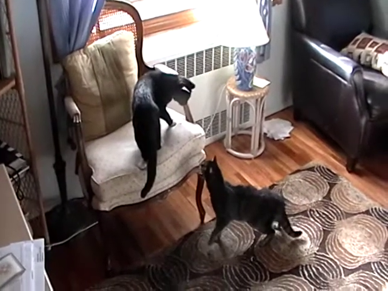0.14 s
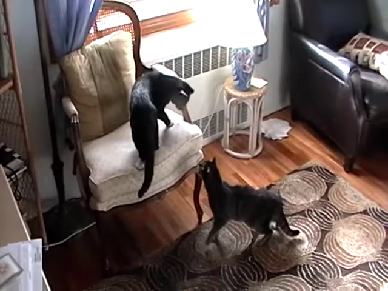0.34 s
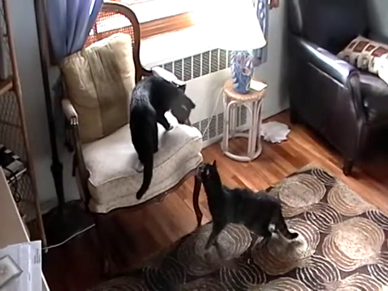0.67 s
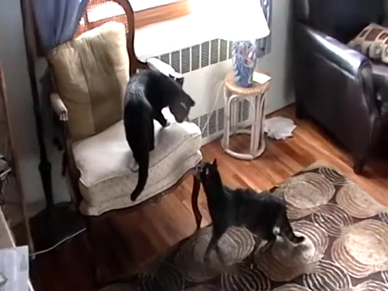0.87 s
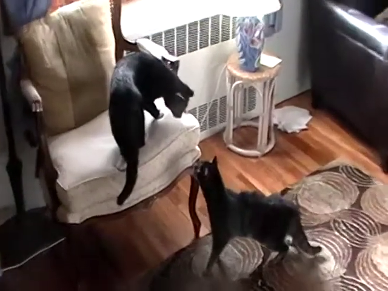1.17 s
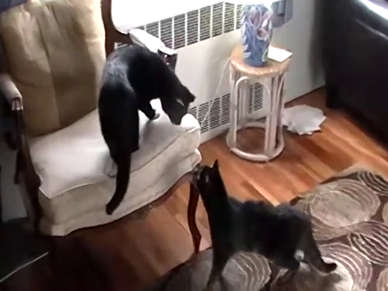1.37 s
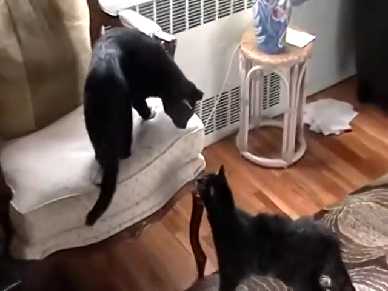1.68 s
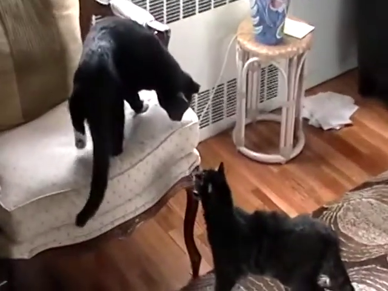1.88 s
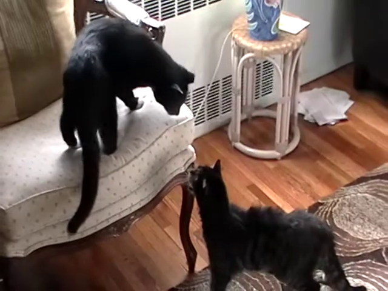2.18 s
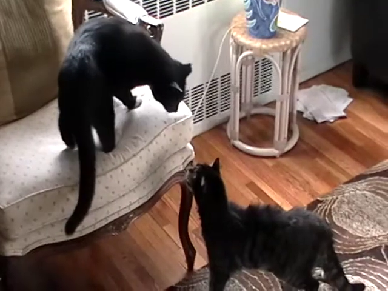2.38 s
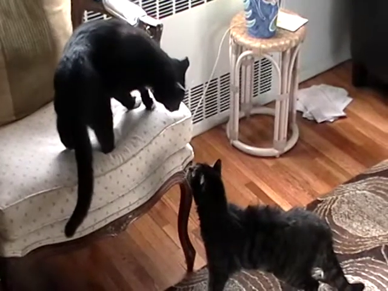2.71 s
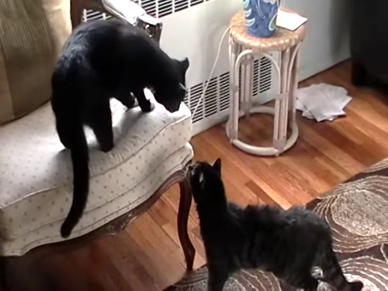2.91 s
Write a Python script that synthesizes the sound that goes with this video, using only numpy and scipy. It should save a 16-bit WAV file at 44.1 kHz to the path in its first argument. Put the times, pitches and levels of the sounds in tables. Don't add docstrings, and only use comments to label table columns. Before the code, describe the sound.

Two tense cat yowls with a short gap between them, breathy and raspy at the edges; a faint distant chirp sounds in the gap, over quiet room hum, hiss and light recorder knocks.

```python
import sys
import numpy as np
from scipy import signal
from scipy.fft import rfft, irfft
from scipy.io import wavfile
from scipy.ndimage import uniform_filter1d

SR = 44100
rng = np.random.default_rng(int(sys.argv[2]) if len(sys.argv) > 2 else 0)


def digitize_waveform(pressure):
    field = np.atleast_2d(pressure).T
    bounded = np.clip(field, -1, 1)
    quanta = np.round(bounded * 32767).astype(np.int16)
    wavfile.write(sys.argv[1], SR, quanta)


def to_linear_factor(level_db):
    exponent = np.asarray(level_db, float) / 20
    return 10 ** exponent


N = 134505


def at_hz(points, hz):
    table_hz, value = np.transpose(points)
    return np.interp(np.log(hz + 1), np.log(table_hz), value)


def rms_one(x):
    return x / np.sqrt(np.mean(x ** 2) + 1e-20)


def drift(rate_hz):
    r = np.exp(-2 * np.pi * rate_hz / SR)
    wander = signal.lfilter([1], [1, -2 * r, r * r], rng.standard_normal(N + SR))
    return rms_one(wander[SR:])


def stereo(mid, side):
    return np.array([mid + side, mid - side])


def pan(x, left_db):
    return x * to_linear_factor(np.array([[left_db], [-left_db]]) / 2)


def bumps(rows, size):
    t = np.arange(N) / SR
    return sum(k * np.exp(-.5 * ((t - row[0]) / row[1]) ** 2) for row, k in zip(rows, size))


def puffs(rows, band_hz):
    band = signal.butter(2, band_hz, "band", fs=SR, output="sos")
    noise = rms_one(signal.sosfilt(band, rng.standard_normal(N)))
    return noise * bumps(rows, to_linear_factor(np.array(rows)[:, -1])) * to_linear_factor(4.0 * drift(100))


# f/Hz, level/dB
TONE_SIDE = [(40, -7), (70, -8.5), (150, 3), (300, -7), (1000, 3.5), (2400, 3.5), (6000, -1.5),
             (15000, -1.5)]


def floor(spectrum, level_db, patchy_db):
    hz = np.fft.rfftfreq(N, 1 / SR)
    inside = (hz > spectrum[0][0]) & (hz < spectrum[-1][0])
    gain = to_linear_factor(at_hz(spectrum, hz)) * inside
    side_gain = to_linear_factor(at_hz(TONE_SIDE, hz))
    noise = rfft(rng.standard_normal((2, N)))
    mid, side = irfft(noise * gain * [np.ones_like(hz), side_gain], N)
    return to_linear_factor(level_db + patchy_db * drift(9.0)) * stereo(mid, side) / np.std(mid)


# f/Hz, density/dB per Hz
RUMBLE = [(15, -48.5), (25, -17.5), (65, 2), (81, 0.5), (141, -5.5), (189, -5.5), (216, -3.5), (240, -10),
          (310, -26.5), (530, -120)]
# f/Hz, density/dB per Hz
TONE = [(140, -27), (240, 0.5), (536, -6), (665, -9), (1030, -10), (1150, -11), (2000, -19), (2500, -25),
        (3250, -41.5), (5500, -120)]
# f/Hz, density/dB per Hz
HISS = [(1470, -18), (2500, -5), (4040, -5.5), (4640, -8), (6640, -9.5), (15500, -19)]


def room_tone():
    rumble = floor(RUMBLE, level_db=-67, patchy_db=0)
    hum = floor(TONE, level_db=-60, patchy_db=.7)
    hiss = floor(HISS, level_db=-69.5, patchy_db=.2)
    return rumble + hum + hiss


# t/s, f/Hz, level/dB
CHIRP = [
    (.97, 2110, -90),
    (1.0, 2075, -68),
    (1.09, 2060, -66),
    (1.15, 1975, -72),
    (1.22, 2040, -67),
    (1.28, 2000, -71),
]


def chirp():
    s, hz, db = np.transpose(CHIRP)
    t = np.arange(N) / SR
    phase = 2 * np.pi * np.cumsum(np.interp(t, s, hz)) / SR
    level_db = np.interp(t, s, db, -150, -150) + 2 * drift(27)
    octave_db = 0
    return to_linear_factor(level_db) * (np.sin(phase) + to_linear_factor(octave_db) * np.sin(2 * phase))


# t/s, peak/dB, f/Hz, snap/dB
CLICKS = [
    (0.401, -39, 880, -20),
    (0.65, -44.5, 860, -27),
    (.697, -42.5, 830, -22.5),
    (0.903, -33.5, 477, -24),
    (1.301, -49.5, 970, -23),
    (2.2335, -40, 890, 10),
    (2.728, -46, 2200, 1),
]


def clicks():
    decay_cycles, snap_decay_s = 11.6, .004
    out, t = np.zeros(N + SR), np.arange(SR // 20) / SR
    band = signal.butter(2, (700, 4500), "band", fs=SR, output="sos")
    for s, db, hz, snap_db in CLICKS:
        attack = np.minimum(t * hz, 1)
        knock = 3 * np.sin(2 * np.pi * hz * t) * to_linear_factor(-60 * t * hz / decay_cycles) * attack
        snap = rng.standard_normal(len(t)) * to_linear_factor(snap_db + 5 - 60 * t / snap_decay_s)
        start = int(s * SR)
        out[start:start + len(t)] += to_linear_factor(db) * (knock + signal.sosfilt(band, snap))
    return pan(out[:N], left_db=-1.5)


# t/s, half length/s, level/dB
RUSTLES = [
    (1.565, 0.019, -64.5),
    (3.0, 0.054, -63.5),
]


def rustles():
    return puffs(RUSTLES, band_hz=(620, 2200))


# t/s, half length/s, breath gain/dB, sizzle/dB
SPITS = [(0.053, 0.01, 5.5, -64), (0.086, 0.012, 9, -70.5), (0.281, 0.02, 4.5, -96),
         (0.622, 0.0046, 1, -80), (0.709, .006, 1.5, -74.5), (0.88, 0.03, 5.5, -74),
         (1.662, 0.028, 12, -69), (1.784, 0.0084, 0, -73.5), (1.837, 0.029, 6.5, -70.5),
         (1.953, 0.0095, 14, -64.5), (2.052, 0.0088, 5.5, -64.5), (2.445, 0.032, 3.5, -81.5),
         (2.652, 0.019, -7.5, -68.5), (2.817, 0.036, -3, -73.5)]


def spits():
    return puffs(SPITS, band_hz=(7000, 10900))


def hump(hz, centre_hz, width_hz, height_db):
    off = 2 * (hz - centre_hz) / width_hz
    return 10 * np.log10(1 + to_linear_factor(2 * height_db) / (1 + off ** 2) ** 2)


# f/Hz, level/dB
THROAT = [(500, -15), (1050, 0), (1600, -10), (2200, -14), (3300, -15), (4200, -26), (7000, -30),
          (10000, -50)]


def tract_db(hz, mouth_hz, height_db, bright_db, top_hz, top_db, chest_db, upper):
    throat = at_hz(THROAT, hz)
    mouth = hump(hz, mouth_hz, 294, height_db)
    bright = bright_db / (1 + (2200 / (hz + 1)) ** 4)
    fall_db_per_khz = 7
    top = hump(hz, top_hz, 190, top_db) - fall_db_per_khz * np.maximum(hz - top_hz, 0) / 1000
    chest = chest_db * (hz < 700)
    return throat + mouth + bright + top + chest + sum(hump(hz, *peak) for peak in upper)


def fading_db(fades, hz):
    out, t = np.zeros(N), np.arange(N) / SR
    for s, half, place_hz, db in fades:
        near = slice(max(int((s - 4 * half) * SR), 0), int((s + 4 * half) * SR))
        width_hz = max(200, .1 * place_hz * (place_hz > 3400))
        off = (hz[near] - place_hz) / width_hz
        out[near] += db * np.exp(-.5 * ((t[near] - s) / half) ** 2 - .5 * off ** 4)
    return out


# t/s, roughness/0-1
ROUGH = [(.1, 1), (.15, .08), (.86, .08), (.9, .8), (1.65, .9), (1.86, .75), (1.9, .3), (2.08, .35),
         (2.13, .08), (2.61, .06), (2.65, .4), (2.72, .35), (2.77, .2), (2.82, .8)]


def fold_rate(pitch, rough, spit_db):
    t, lag_s = np.arange(N) / SR, .02
    path = uniform_filter1d(np.interp(t, *np.transpose(pitch)), size=int(lag_s * SR))
    jitter = .0007 * drift(38)
    rasp = .007 * (rough + .1 * spit_db) * drift(120)
    settle = 130 * np.maximum(t - pitch[-1][0], 0)
    scoop = 1200 * np.maximum(pitch[0][0] - t, 0)
    return path * (1 + jitter + rasp) + settle + scoop


def overtones(hz, turns, rough, tract, fades):
    voice = np.zeros(N)
    for k in range(1, 21):
        shimmer = .5 * np.clip(k - 5, .5, 8) * drift(28)
        grain = 5 * rough * np.clip((k - 3) / 3, 0, 1.5) * drift(80)
        level_db = tract_db(k * hz, *tract) + shimmer + fading_db(fades, k * hz) + grain
        voice += to_linear_factor(level_db) * np.sin(2 * np.pi * k * turns + k * k)
    return np.sqrt(2) * voice


# f/Hz, width/Hz, height/dB
AIR_PALATE = (4300, 790, 4.2)


def breath_air(turns, mouth, height, bright, top, top_db, upper):
    bins, times, air = signal.stft(rng.standard_normal(N), SR, nperseg=512)
    at = np.minimum((times * SR).astype(int), N - 1)
    hz = bins[:, None]
    colour = tract_db(hz, mouth[at], 0.57 * height[at], 0.45 * bright[at], top[at], top_db[at] / 2, 0, upper)
    tilt_db_per_octave = 8
    colour = colour + tilt_db_per_octave * np.log2(hz / 2000 + 0.0057) + hump(hz, *AIR_PALATE)
    air = signal.istft(air * to_linear_factor(colour), SR, nperseg=512)[1][:N]
    return air * (1 + 1.15 * np.cos(2 * np.pi * turns))


# t/s, half length/s, f/Hz, change/dB
SWELLS = [(0.66, 0.1, 2200, 7), (.47, 0.02, 1660, 2.5), (0.079, 0.017, 1600, -15), (0.913, 0.044, 590, 0),
          (2.505, 0.051, 2900, -16.5), (2.02, 0.012, 4800, -7.5), (2.865, 0.013, 505, 27),
          (2.6, 0.044, 1010, -7)]


def yowl(pitch, shape, head, upper, fades):
    t = np.arange(N) / SR
    s, *columns = np.transpose(shape)
    effort, mouth, height, bright, breath = [np.interp(t, s, c) for c in columns]
    head_s, *columns = np.transpose(head)
    top, top_db, chest = [np.interp(t, head_s, c) for c in columns]
    rough = np.interp(t, *np.transpose(ROUGH))
    spit_db = bumps(SPITS, np.array(SPITS)[:, 2])
    late, early = np.maximum(t - s[-1], 0), np.maximum(s[0] - t, 0)
    hz = fold_rate(pitch, rough, spit_db)
    turns = np.cumsum(hz) / SR
    tract = mouth, height, bright, top, top_db, chest, upper
    release_s, sigh_s = .11, .14
    voice = overtones(hz, turns, rough, tract, fades + SWELLS) * to_linear_factor(-60 * late / release_s)
    air = breath_air(turns, mouth, height, bright, top, top_db, upper)
    air_db = breath + 16.5 + 2.5 * drift(45) + spit_db - 30 * late / sigh_s
    return to_linear_factor(effort - 18000 * early) * (voice + air * to_linear_factor(air_db))


# t/s, f/Hz
PITCH = [
    [(.05, 540), (.13, 549), (.2, 541), (.265, 533), (.31, 544), (.38, 553), (.53, 555), (.6, 550),
     (.86, 550)],
    [(1.69, 469), (1.88, 524), (2.04, 519), (2.09, 505), (2.29, 513), (2.44, 513), (2.5, 521), (2.595, 522),
     (2.668, 483)],
]
# t/s, effort/dB, mouth f/Hz, mouth height/dB, brightness/dB, breath/dB
YOWL_1 = [(0.034, -83, 2410, 31, 31.5, -5.5), (0.056, -51.5, 2340, 32, -5.5, -4),
          (.14, -49, 1954, 23, 11, -18), (.23, -51.5, 1750, 34, 5, -40),
          (.30, -44.5, 1562, 27.5, 2.5, -18.5), (0.469, -40.5, 1740, 32.5, -1.5, -20.5),
          (.62, -33, 1585, 21, -9, -23), (0.857, -32, 1545, 19.5, -12.5, -32.5),
          (0.901, -60, 1510, 11.5, 1, -2.5)]
YOWL_2 = [(1.634, -49.5, 2490, 24.5, -26, -23), (1.698, -41, 2405, 15.5, -8.5, -17),
          (1.919, -38, 2405, 30.5, 5, -28), (2.141, -37, 2134, 30, 3.5, -24.5),
          (2.283, -32, 1740, 12, -3, -26.5), (2.501, -33.5, 1570, 19.5, -0.5, -42.5),
          (2.618, -42.5, 1265, 26, 8, -44.5), (2.677, -47.5, 890, 31, -2, -19.5),
          (2.796, -45.5, 985, 15.5, -10, -6)]
# t/s, top f/Hz, top height/dB, chest/dB
HEAD_1 = [(.04, 6200, -18.5, 2.5), (.13, 6780, 13, -1.5), (.27, 7170, 22.5, 7.5), (.45, 8400, -1, 4),
          (0.621, 8280, 21, -3), (0.861, 8560, 35.5, -6), (0.901, 7000, 26, 27)]
HEAD_2 = [(1.64, 6130, 1.8, 4.5), (1.85, 6270, 3.2, 2), (2.069, 6710, 4, 4), (2.14, 6810, 8.3, -4.5),
          (2.35, 8540, 4, -3), (2.6, 8570, 3.6, 13), (2.652, 7700, 2, 5.5), (2.721, 6710, 2.2, 17.5),
          (2.8, 6300, 2.3, 17)]
# f/Hz, width/Hz, height/dB
UPPER = [
    [(5727, 206, 19), (3020, 1090, 4.5)],
    [(5780, 1320, 13), (4010, 140, 9)],
]
# t/s, half length/s, f/Hz, change/dB
FADES = [
    [(.078, .002, 2140, -13), (.09, 0.0015, 2180, -9), (.219, .015, 2750, -25.5), (.25, 0.029, 3230, -18),
     (.266, 0.0063, 2260, -12), (.311, .005, 1630, -18), (.32, 0.011, 545, -19.5), (.327, 0.0049, 1640, -6),
     (.427, 0.0084, 2215, -15), (.462, 0.023, 3380, -17), (.477, .02, 2820, -23),
     (.477, 0.018, 2225, -12.5), (.53, 0.0049, 1640, -3), (.54, 0.021, 1110, -7.5),
     (.574, 0.0035, 2205, -24), (.637, 0.005, 2200, -22), (.725, 0.0054, 2200, -27.5),
     (.812, .007, 2200, -23), (.65, 0.54, 3655, -9.5), (.7, 0.34, 3300, 10)],
    [(1.72, 0.054, 3530, 16.5), (1.745, 0.0034, 2420, -7.5), (1.775, 0.0044, 2480, -5.5),
     (1.791, 0.0044, 1000, -7.5), (1.804, 0.017, 1440, -20.5), (1.82, .02, 3530, 8.5),
     (1.86, 0.0033, 2590, -13.5), (1.865, 0.0021, 1560, -25), (1.893, 0.0065, 1045, -8.5),
     (1.943, 0.0089, 2085, -26), (1.955, 0.0056, 2580, -19), (1.94, 0.016, 4140, 8.5),
     (2.049, 0.011, 2060, -33.5), (2.05, 0.0056, 2620, -19), (2.073, 0.0038, 2550, -6),
     (2.141, 0.032, 1505, -10.5), (2.15, .018, 3600, -20), (2.29, 0.016, 2110, 14),
     (2.27, 0.012, 2100, -27), (2.288, 0.0079, 1550, -13), (2.375, 0.016, 1538, -16),
     (2.469, 0.0036, 2065, -14), (2.471, 0.0069, 1570, -23), (2.505, 0.012, 1050, -10),
     (2.626, 0.0048, 2010, -9), (2.647, 0.0048, 1010, -11.5), (2.716, 0.0088, 970, -26.5),
     (2.73, 0.0042, 1005, -31), (2.76, 0.096, 5340, 19.5), (2.79, 0.0066, 493, 7)],
]


def cat():
    first = yowl(PITCH[0], YOWL_1, HEAD_1, UPPER[0], FADES[0])
    second = yowl(PITCH[1], YOWL_2, HEAD_2, UPPER[1], FADES[1])
    return first + second


def room(x):
    t60_s, delay_s, level_db, side_db = 0.27, 0.0096, -11, -6
    t = np.arange(SR) / SR
    tail = rng.standard_normal((SR, 2)).T * to_linear_factor(-60 * t / t60_s) * (t > delay_s)
    tail = signal.sosfilt(signal.butter(1, 9500, fs=SR, output="sos"), tail)
    mid, side = signal.fftconvolve(x[None], tail / np.linalg.norm(tail[0]))[:, :N]
    return to_linear_factor(level_db) * stereo(mid, to_linear_factor(side_db) * side)


def scene():
    far = cat() + spits() + rustles() + chirp()
    ground = room_tone()
    return pan(far, left_db=0.5) + room(far) + clicks() + ground


def roll_off(x):
    return signal.sosfilt(signal.butter(12, 15710, fs=SR, output="sos"), x)


def record(dry):
    return roll_off(dry)


dry = scene()
out = record(dry)
digitize_waveform(out)
```